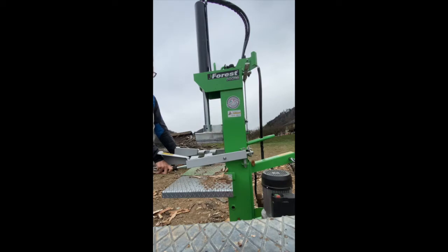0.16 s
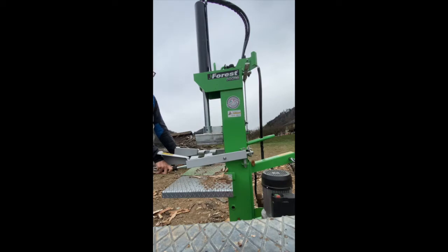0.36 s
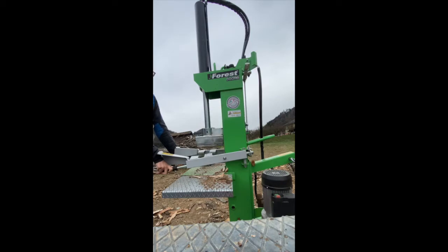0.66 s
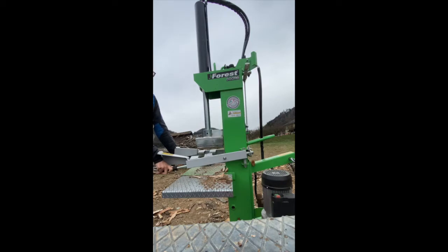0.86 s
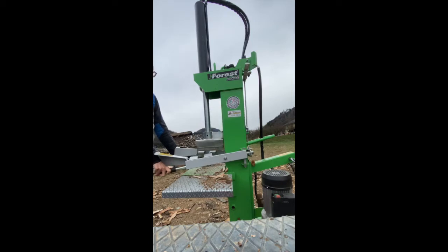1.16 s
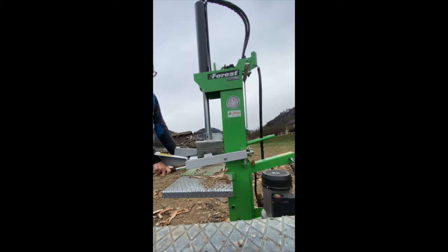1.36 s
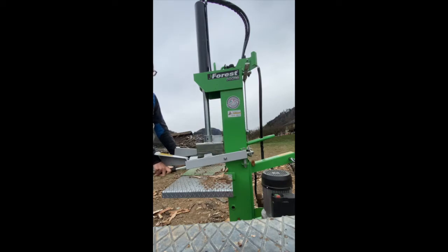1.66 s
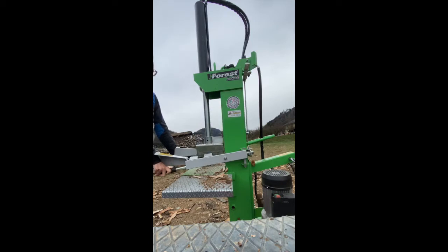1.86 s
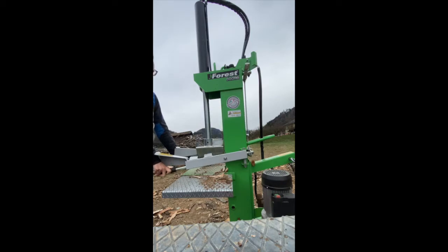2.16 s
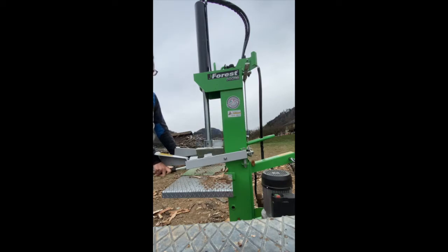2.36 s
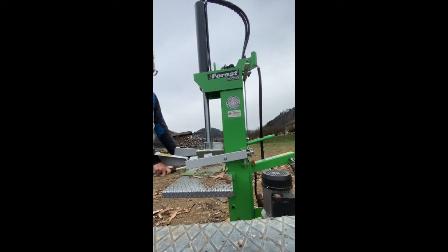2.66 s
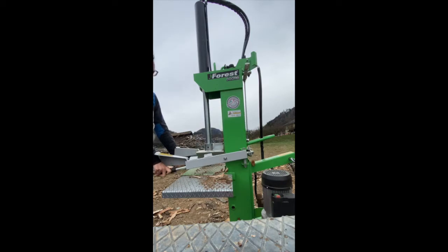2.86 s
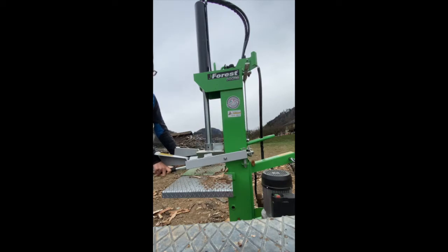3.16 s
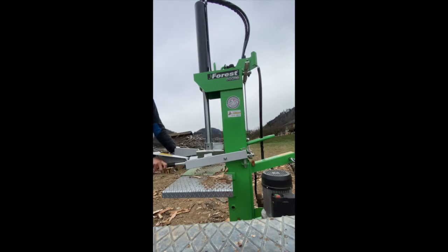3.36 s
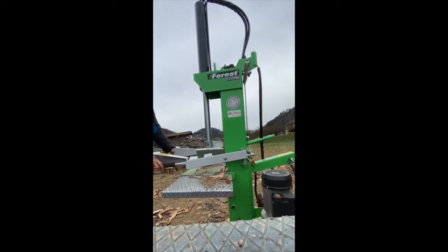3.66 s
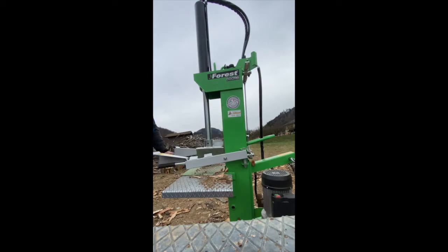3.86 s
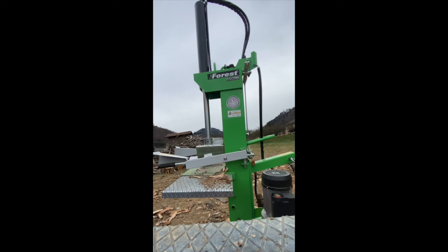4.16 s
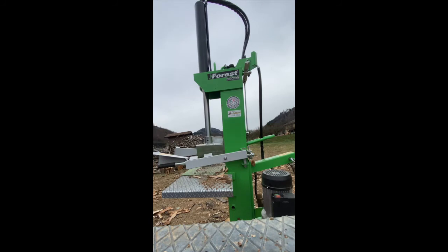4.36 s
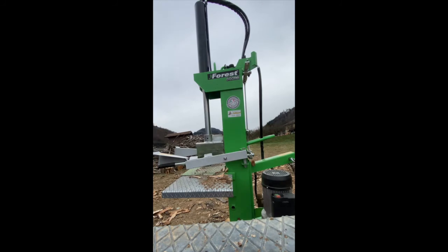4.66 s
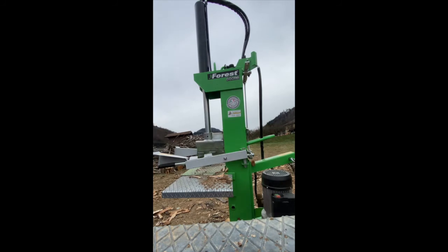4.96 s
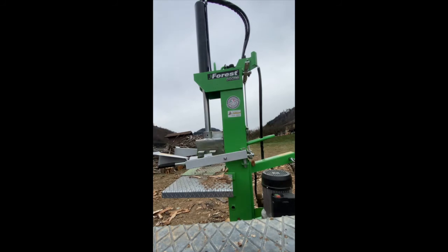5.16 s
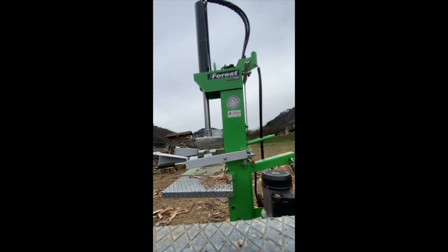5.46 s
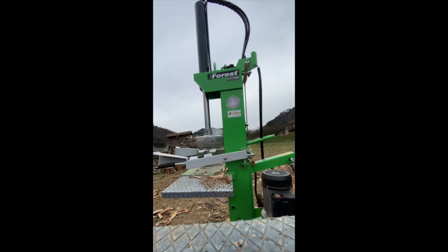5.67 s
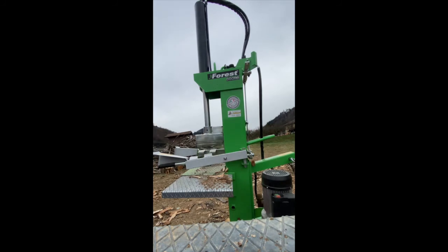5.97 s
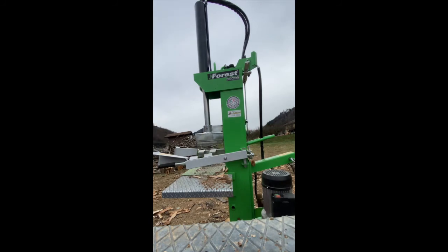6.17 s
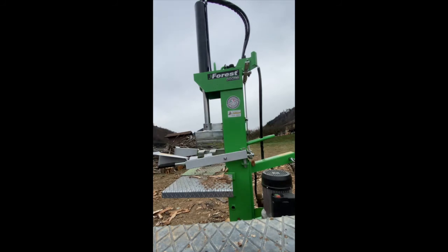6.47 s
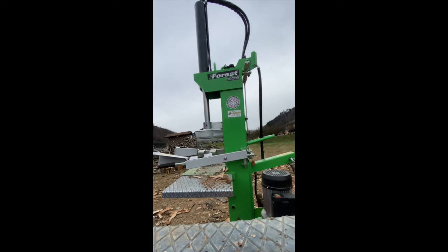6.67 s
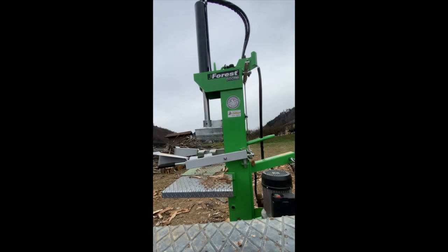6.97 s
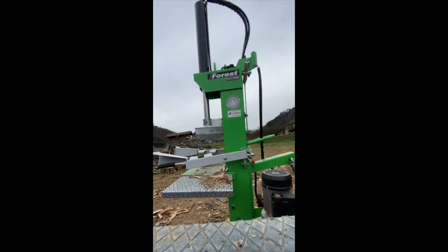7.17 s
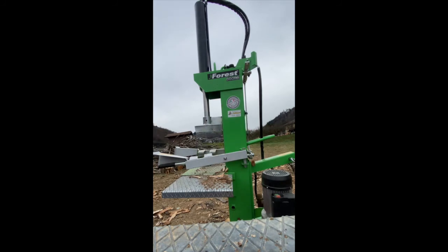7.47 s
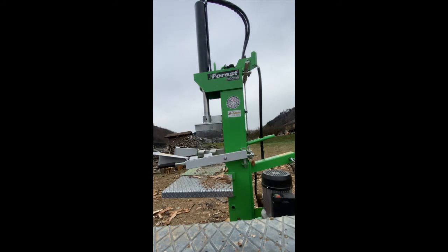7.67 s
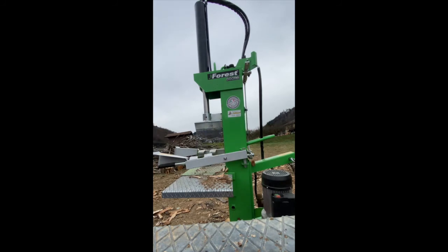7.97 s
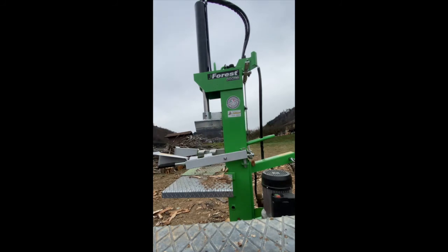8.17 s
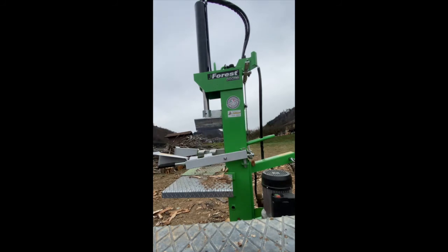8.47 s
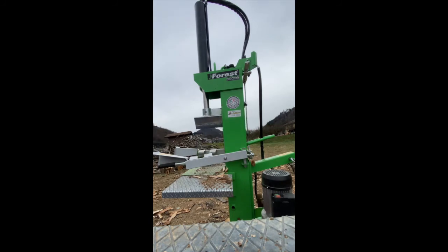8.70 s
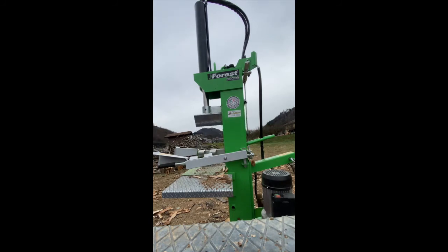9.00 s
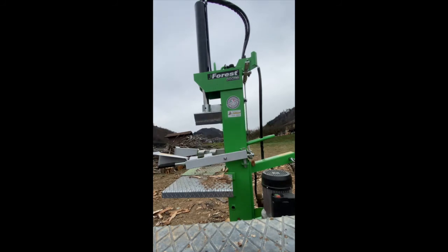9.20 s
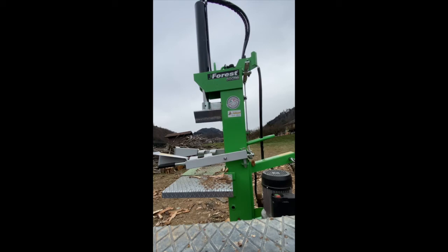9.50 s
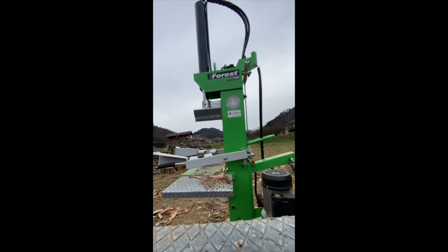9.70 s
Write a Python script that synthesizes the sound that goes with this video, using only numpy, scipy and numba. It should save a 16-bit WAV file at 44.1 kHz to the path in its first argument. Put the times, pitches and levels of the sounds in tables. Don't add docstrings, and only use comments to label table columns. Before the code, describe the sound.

Outdoors, an electric hydraulic log splitter runs without wood. Its gear pump holds a nasal, mid-low whine that sinks very slightly as the ram goes down. At about three seconds the tone collapses, a quick burst of steel clanks rattles the frame, and the whine returns a little higher while the ram rises. Casing rumble, oil hiss and motor hum continue throughout. Wind thumps on a phone a few metres away, in stereo.

```python
import sys
import numpy as np
from scipy import signal
from scipy.fft import rfft, irfft, next_fast_len
from scipy.io import wavfile
from scipy.ndimage import uniform_filter1d
from numba import njit

SR = 44100
rng = np.random.default_rng(int(sys.argv[2]) if len(sys.argv) > 2 else 0)


def unload_wav(signal):
    wavfile.write(
        sys.argv[1],
        SR,
        np.round(np.clip(np.atleast_2d(signal).T, -1, 1) * 32767).astype(np.int16),
    )


def makeup_ratio(level_db):
    decades = np.asarray(level_db, float) / 20
    return 10 ** decades


N = 433944
TIME = np.arange(N) / SR
SIZE = next_fast_len(N)
HZ = np.arange(SIZE // 2 + 1) * SR / SIZE
SIDES = np.array([[1], [-1]])
LEVER_OFF_S = 2.88
TEETH, MAINS_HZ = 9, 50

# [t/s, f/Hz]
TOOTH_RATE = [(0, 416), (2.45, 407.6), (2.52, 409), (2.6, 407.6), (2.8, 407), (2.845, 397),
              (2.875, 393), (2.915, 434.5), (3.14, 433), (3.3, 430), (3.5, 433),
              (4, 434), (6.6, 434.4), (7.05, 433.5), (7.4, 434.2), (8, 433.5), (8.4, 432.4),
                 (8.9, 430.5), (9.84, 428.8)]
# [t/s, phase: 0 ram starting down, 1 near the bottom, 2 returning, 3 near the top or idling]
STROKE = [(0, 0), (.9, 0), (1.9, 1), (2.35, 1), (2.6, .4), (2.86, .4), (2.91, 3), (3.12, 3), (3.2, 2),
          (6.5, 2), (8.8, 3), (9.84, 3)]
# [t/s, share of travel]
RAM_HEIGHT = [
    (0, .7),
    (2.86, 0),
    (3.2, 0),
    (9.84, 1),
]
# [t/s, level/dB]
TOOTH_TONE = [(0, -16.5), (.4, -19), (.9, -17), (2.505, -18), (2.53, -24.5), (2.59, -20), (2.745, -19.5),
              (2.84, -30), (2.865, -44), (2.93, -39.5), (3.14, -37), (3.2, -26.5), (3.3, -19.5),
              (3.35, -22.5), (3.45, -17.5), (4.0, -20.5), (6.0, -22), (9.84, -23.5)]
LOW_ORDERS = [8, 10, 12, 17, 18, 19, 20, 26, 27, 28, 35, 36, 44, 45, 46, 53, 54, 62, 63, 64, 71, 72]
HIGH_ORDERS = [80, 81, 89, 90, 91, 99, 107, 108, 116, 117, 118, 125, 126, 135, 144, 153, 162, 172, 179, 180,
               188, 198]
# [starting down level/dB, near bottom level/dB,
# returning level/dB, near top level/dB, left minus right level/dB]
ORDER_LEVELS = [(-73.5, -75.5, -48.5, -55, -1), (-57, -76.5, -48, -49.5, 4),
                (-59, -54.5, -53.5, -54, -2.5), (-65.5, -69.5, -61.5, -61, -6),
                (-38.5, -37.5, -50.5, -50, -6), (-50, -53.5, -46, -52, -7.5),
                (-62.5, -59.5, -69, -64.5, 1.5), (-44, -53, -62.5, -74.5, -5.5),
                (-39, -45, -49, -43, -11), (-39.5, -40.5, -57, -54, -10), (-60, -59, -76.5, -64, 6.5),
                (-50.5, -51, -57, -47.5, 0.5), (-60.5, -61, -75.5, -72.5, 5),
                (-54.5, -53, -57, -59, -2), (-64.5, -66, -75, -65.5, -2),
                (-59, -62.5, -65.5, -71, -7.5), (-59, -57.5, -48.5, -50, -9),
                (-63.5, -62, -63.5, -61, -8), (-62, -63, -55.5, -51, 1), (-80, -66, -78, -72.5, -1),
                (-60, -65, -63.5, -59, -5.5), (-59, -52, -82.5, -69.5, -13),
                (-77, -80, -68, -73, -2), (-77, -72, -74, -65, -1), (-74, -62, -70, -72, 2),
                     (-75, -69, -61, -63, 0), (-80, -80, -68, -68, -3), (-79, -74, -63, -63, 0),
                     (-70, -70, -63, -66, -2), (-70, -72, -76, -70, 2), (-74, -64, -58, -59, -1),
                     (-69, -54, -64, -61, -2), (-73, -67, -63, -60, 0), (-71, -71, -62, -68, -1),
                     (-59, -58, -61, -61, -3), (-70, -68, -78, -73, -1), (-73, -72, -67, -66, 0),
                     (-59, -58, -58, -67, 0), (-61, -67, -66, -74, 1), (-80, -80, -59, -73, 3),
                     (-68, -63, -60, -56, 1), (-58, -65, -80, -57, 1), (-60, -61, -70, -73, 2),
                     (-66, -62, -67, -72, 0)]
# [t/s, depth level/dB, half width t/s]
OCTAVE_DIPS = [
    (.27, -7.5, 0.2734),
    (1.0, -10.5, 0.1614),
]
IDLE_ORDERS = {4 * TEETH: (2.99, 3.15, 4), 6 * TEETH: (2.9, 3.1, -.5)}

# [t/s, low level/dB, middle level/dB, treble level/dB, 60 dB decay t/s]
CLANKS = [(3.150, -41.5, -23, -36, 0.05334), (3.159, -22.5, -33, -34, 0.1283),
          (3.164, -26.5, -39, -44, .08), (3.183, -22.5, -40, -29, 0.14), (3.194, -27.5, -26, -17, 0.0799),
          (3.196, -18.5, -32.5, -35, 0.3478), (3.210, -29.5, -30.5, -22, 0.1173),
          (3.2232, -18, -24, -29.5, 0.1505), (3.227, -14.5, -36.5, -26.5, .06),
          (3.230, -15.5, -23.5, -23.5, 0.1042), (3.235, -22, -21.5, -25.5, 0.0869),
          (3.245, -24.5, -27.5, -37.5, 0.11), (3.253, -26.5, -36.5, -46, 0.3534)]
# [f/Hz, level/dB, 60 dB decay t/s]
FRAME_MODES = [(697.6, 4.5, 0.2953), (790.06, -9.5, 0.43), (1134.1, -3, 0.2), (1328.2, -9, 0.33),
               (1666.8, -4, 0.25), (1766.1, -9.5, 1.056), (2224, -8.5, 0.17), (2244, -1.5, 0.058),
               (2643, -3, 0.1535), (3122.7, -6, 0.23), (3221.9, -6.5, 0.12), (4132, -8, 0.15),
               (4167.9, 2, 0.2), (4257, -5, 0.2), (5765, -19.5, 0.19), (6286, -17, 0.19), (8071, -3, 0.21)]
# [t/s, peak level/dB, ring f/Hz, 60 dB decay t/s]
TICKS = [(3.1505, -21.5, 3395, 0.01109), (3.1575, -22, 1507, .015), (3.185, -21, 898.6, .015),
         (3.1945, -22, 4529, .02), (3.197, -18.5, 1903, 0.0117), (3.2245, -11, 1500, .01),
         (3.2271, -4.5, 1050, .006), (3.2295, -15, 3696, 0.011), (3.2325, -12, 700.9, 0.013),
         (3.234, -19, 4110, 0.04536), (3.237, -14, 1303, 0.0088), (3.2485, -15, 600, .02),
         (3.166, -21, 550, .025), (3.204, -19, 600, .02), (3.2125, -19, 1000, .012),
         (3.217, -20, 1700, .01), (3.2565, -21, 3000, .012), (3.263, -21, 1900, .012),
         (3.272, -20, 900, .015), (3.286, -24, 1500, 0.01361)]

# [f/Hz, density level/dB per Hz]
CASING_SPECTRUM = [(150, -85), (260, -71), (450, -73.5), (650, -71), (930, -64.5), (1100, -68.5),
                   (1230, -71), (1440, -67.5), (1700, -72), (2230, -80.5), (2580, -79), (3450, -84),
                   (4700, -85), (5700, -77.5), (6800, -110)]
# [f/Hz, density level/dB per Hz]
HISS_SPECTRUM = [(5500, -95), (6350, -87), (7200, -77), (7900, -80), (8600, -75), (9500, -77.5),
                 (10500, -79), (11500, -83), (12500, -78.5), (14100, -79.5), (14900, -92), (15500, -77.5),
                 (16500, -85)]
# [f/Hz, width f/Hz, level/dB]
OIL_JETS = [(5682.4, 120, -61), (6901.3, 150, -58), (7374, 150, -64.5), (8349, 100, -50), (8560.4, 90, -51),
            (8986.5, 130, -65), (14041, 200, -62.5)]

MAINS_ORDERS = [2, 6, 14, 28]
# [level/dB, left minus right level/dB]
MAINS_LEVELS = [(-62.5, -1), (-57.5, 1), (-48.5, -8), (-57.5, -4.5)]

# [t/s, level/dB]
BREEZE = [(0, -47.5), (.6, -55), (2.4, -55), (2.65, -65), (3.0, -48.5), (3.9, -44), (4.25, -50),
          (4.9, -42.5), (5.2, -43), (5.33, -57), (5.5, -40.5), (7.0, -41), (7.15, -59), (7.5, -51.5),
          (7.8, -52), (8.3, -45), (9.55, -43.5), (9.75, -57.5)]
# [t/s, peak level/dB, fall by 20 dB t/s, upper part level/dB]
GUSTS = [(.05, -42.5, 0.0063, -6), (.44, -41, 0.0535, -7.5), (1.22, -36.5, 0.127, -3.5),
         (1.32, -42, 0.242, -4.5), (2.48, -38.5, 0.0591, -2), (2.8, -43, 0.0467, -10),
         (3.0, -36, 0.0858, -2.5), (3.13, -35.5, 0.1543, -4.5), (3.4, -37, 0.0219, -3.5),
         (3.53, -31.5, 0.1189, -11.5), (3.77, -32.5, 0.0303, 1.5), (3.84, -33.5, 0.145, -12.5),
         (4.47, -41, 0.067, -10), (4.9, -36.5, 0.1641, 0.5), (5.04, -37, 0.1652, -1),
         (5.43, -31, 0.1319, -0.5), (5.62, -34.5, 0.024, 2.5), (5.73, -31.5, 0.0849, -13.5),
         (5.89, -28.5, 0.1439, -6), (6.14, -32, 0.1073, -4.5), (6.38, -34.5, 0.0948, 0.5),
         (6.5, -30.5, 0.1394, -6.5), (6.75, -36, 0.0771, 5.5), (6.91, -33.5, 0.1256, 0.5),
         (7.3, -36.5, 0.0871, -7.5), (7.48, -31.5, 0.1334, -4.5), (8.47, -42, 0.4176, -1.5),
         (8.9, -38.5, 0.0748, -5.5), (9.47, -36, 0.0751, -6), (9.57, -29.5, 0.0897, -7.5)]
# [t/s, peak level/dB, f/Hz, left minus right level/dB]
THUMPS = [(0.438, -37, 139.9, -2.5), (1.209, -34, 229.6, -15), (2.458, -36, 229.8, -9),
          (2.99, -33, 230.2, -14), (3.067, -36, 229.8, -6.5), (3.124, -35.5, 180, -7),
          (3.409, -31, 139.8, -4), (3.474, -38, 230, -7), (3.523, -27.5, 109.9, -3),
          (3.731, -28, 230.1, -13.5), (3.764, -25.5, 230.2, -9.5), (3.838, -31.5, 85, 0.5),
          (3.921, -37.5, 179.8, -10), (3.953, -38, 230, -12.5), (4.892, -32.5, 229.6, -3.5),
          (4.964, -37.5, 229.8, 0), (5.003, -33.5, 229.7, -12.5), (5.11, -32, 140.1, -2),
          (5.24, -38.5, 229.8, 0), (5.379, -35, 229.8, -12.5), (5.442, -27.5, 230.6, -12.5),
          (5.512, -29.5, 229.9, -7), (5.552, -37, 180, -12), (5.589, -36, 230, -2.5),
          (5.626, -27.5, 229.1, -8), (5.659, -33.5, 230.3, -14), (5.691, -32, 110, 3),
          (5.849, -37.5, 230.1, -4.5), (5.881, -30, 230.1, -8), (5.922, -28, 139.8, -10.5),
          (6.034, -35.5, 139.7, -2), (6.13, -32, 230.1, -36), (6.332, -29, 140.1, -6),
          (6.372, -28.5, 229.7, -13), (6.474, -29, 230, -5.5), (6.543, -30.5, 110, -0.5),
          (6.598, -38, 180, -6), (6.658, -34, 140.1, -5), (6.748, -27, 229.5, -10.5),
          (6.846, -32.5, 229.9, -8.5), (6.905, -26.5, 179.6, -9.5), (6.956, -34, 110, -1.5),
          (7.029, -37, 230.1, -7), (7.426, -33, 84.9, -6.5), (7.481, -30, 140, -3),
          (8.467, -36.5, 140.1, -8), (8.68, -35, 109.9, -3), (9.461, -34.5, 229.3, -7.5),
          (9.501, -38.5, 230, -10), (9.566, -31, 230.1, -10)]

# [f/Hz, phase/rad]
PORT_LEAD = [(0, 0), (600, -1.3), (1460, .2), (2600, .3), (3200, .9), (3900, -.2), (4350, 2.2), (4800, 2.1),
             (5300, 1.1), (6050, 2.0), (6400, 3.14), (8000, 3.14), (9800, 6.28), (11400, 6.28),
             (12930, 9.42), (14900, 9.42), (15300, 11.6), (16100, 11.8)]
# [f/Hz, left minus right level/dB]
PORT_PAN = [(60, 4.5), (110, -2.5), (200, -0.5), (380, -1), (700, -11.5), (1290, -10), (2380, 4),
            (4400, -1), (8120, 2.5), (13000, 0)]


def pump(shaft, shaft_hz, stroke, height):
    tooth_db, down = curves(TOOTH_TONE)[0], TIME < LEVER_OFF_S
    pan_db = np.where(down, -1.0 + 1.8968 * height, 2.5 + 0.93 * height) + .4 * walk(2.98)
    lead_rad = np.where(down, -0.4367 - 0.18 * height, -1.1234 + 0.514 * height)
    out = np.zeros((2, N))
    add_sine(out, TEETH * shaft, tooth_db + 0.088 * walk(30) + .3 * walk(3), pan_db, lead_rad)

    relief_db = 0.3218 * np.minimum(tooth_db + 24.5, 0)
    crossing_db = -12 * np.exp(-((TIME - 2.88) / .035) ** 4)
    wavers = [walk(4.0) + 0.5785 * walk(14) for _ in range(6)]
    dips_db = sum(db * np.exp(-((TIME - s) / half_s) ** 8) for s, db, half_s in OCTAVE_DIPS)
    waver_db = np.where(down, .8, 1.8)
    orders = LOW_ORDERS + HIGH_ORDERS
    starts = 2 * np.pi * rng.random(len(orders))
    for order, (*levels, pan) in zip(orders, ORDER_LEVELS):
        harmonic = (order + 4) // TEETH
        from_s, to_s, idle_db = IDLE_ORDERS.get(order, (0, 0, 0))
        singing = (TIME > from_s) & (TIME < to_s)
        db = np.interp(stroke, range(4), levels) + np.where(singing, idle_db, relief_db) + crossing_db
        if order == 2 * TEETH:
            db = db + 0.9306 * wavers[0] + dips_db
        db = db + waver_db * wavers[harmonic % 6]
        start = starts[harmonic] + 0.324 * wavers[(harmonic + 3) % 6]
        add_sine(out, order * shaft + start, db, np.full(N, 1. * pan), lead(order * shaft_hz))
    return out


def valve():
    bands = np.array([band(384.1, 1665.8), band(2424.5, 6470), band(6153, 13946)])
    rattle, blows, cracks = np.zeros((3, N)), np.zeros(N), np.zeros(N)
    t = TIME[:SR // 2]
    for s, low_db, mid_db, high_db, t60 in CLANKS:
        i = int(s * SR)
        fall = 1000 ** (-t / np.clip(t60, .02, .5)) * (1 - np.exp(-t / 0.00039))
        rattle[:, i:i + len(t)] += (makeup_ratio([[low_db - 4.0], [mid_db - 4.0], [high_db]]) * fall) ** 2
        blows[i] = makeup_ratio(mid_db + low_db + 14.5)
        cracks[i] = makeup_ratio(2 * low_db + 12)
    ring = sum(makeup_ratio(db) * damped_sine(t, hz, t60) for hz, db, t60 in FRAME_MODES)
    crack = np.exp(-t / 0.0004) * np.cos(2 * np.pi * 1300 * t)
    struck = signal.fftconvolve(blows, ring)[:N] * makeup_ratio(-4.5)
    struck += signal.fftconvolve(cracks, crack)[:N]
    rough = np.sum(np.sqrt(rattle) * bands, axis=0)
    scattered = 0.4703 * np.roll(rough, 331) * SIDES
    return ports(rough + struck + ticks()) + scattered


def ticks():
    out, t = np.zeros(N), TIME[:SR // 10]
    for s, db, hz, t60 in TICKS:
        i = int(s * SR)
        out[i:i + len(t)] += makeup_ratio(db) * damped_sine(t, hz, t60)
    return out


def flow(shaft, height):
    casing_db = -1.149 + 0.8676 * height - .5 * (TIME < LEVER_OFF_S)
    hiss_db = -1.6156 + 3 * height
    throb = 1 + 0.0356 * np.cos(shaft) + .08 * np.cos(2 * shaft) + 0.069 * np.cos(TEETH * shaft)

    casing = coloured(CASING_SPECTRUM, 0.30555)
    body = signal.sosfilt(signal.butter(2, 1100, fs=SR, output="sos"), casing)
    panels = casing - body
    casing = body * makeup_ratio(.8 * walk(6)) + panels * makeup_ratio(0.769 * walk(6))
    casing = casing * makeup_ratio(casing_db) * throb

    flutter_db = 0.55 * walk(9) + 0.7528 * walk(20) + 0.5606 * walk(80)
    hiss = coloured(HISS_SPECTRUM, .05) * makeup_ratio(hiss_db + flutter_db) * throb

    jets = np.zeros(N)
    for hz, width_hz, db in OIL_JETS:
        jets += makeup_ratio(db + 1.6 * walk(2.7)) * band(hz - width_hz / 2, hz + width_hz / 2)
    return casing + hiss + ports(jets * makeup_ratio(hiss_db))


def motor(shaft):
    mains = 2 * np.pi * MAINS_HZ * TIME
    out, flat = np.zeros((2, N)), np.ones(N)
    line_db = np.interp(TIME, [.5, 1.2, 2.75, 2.88], [-46.5, -42, -42.5, -55]) + 2.3 * walk(16)
    add_sine(out, TEETH * shaft + 2 * mains, line_db, -2.5 * flat, -.6 * flat)
    off_load_db = -3 * (TIME > LEVER_OFF_S)
    for order, (db, pan_db) in zip(MAINS_ORDERS, MAINS_LEVELS):
        hum_db = db + off_load_db + 3.5164 * walk(9)
        add_sine(out, order * mains, hum_db, pan_db * flat, lead(order * MAINS_HZ) * flat)
    return out


def wind():
    patch = walk(30)
    breeze_db = curves(BREEZE)[0] - 5 + 6 * patch + np.array([[0], [-6]])
    gust_db = 2.5 * patch + np.array([[-2], [-6.5]])
    power = makeup_ratio(2 * breeze_db) + gusts() * makeup_ratio(2 * gust_db)
    low = steady(band(43.28, 118.41, order=3)) + 0.3096 * SIDES * band(60, 140)
    upper = np.array([0.8186 * steady(band(118, 319)), 1.2298 * steady(band(121, 301))])
    calm_power = makeup_ratio(2 * -58.5)
    return np.sqrt(power[0]) * low + np.sqrt(power[1] + calm_power) * upper + thumps()


def gusts():
    low, upper = np.zeros((2, N))
    for s, peak_db, fall_s, upper_db in GUSTS:
        away_s = np.maximum(TIME - s, (s - TIME) / 0.896)
        power = makeup_ratio(2 * peak_db - 40 * away_s / fall_s)
        low = low + power
        upper = upper + power * makeup_ratio(2 * upper_db)
    return np.array([low, upper])


def thumps():
    out, cycles = np.zeros((2, N)), 0.5457
    turns = rng.random((len(THUMPS), 2))
    for (s, db, hz, pan_db), turn in zip(THUMPS, turns):
        i = slice(int((s - .04) * SR), int((s + .04) * SR))
        t = TIME[i] - s
        tilt = makeup_ratio(np.clip(pan_db, -14, 14))
        gain = makeup_ratio(db + 2.5) * 2 / (1 + tilt) * np.array([[tilt], [1]])
        phase = hz * t + turn[0] + 0.2589 * (turn[1] - .5) * SIDES
        out[:, i] += gain * np.exp(-.5 * (t * hz / cycles) ** 2) * np.cos(2 * np.pi * phase)
        push_hz = hz * .5
        push = np.exp(-.5 * (t * push_hz / cycles) ** 2) * np.sin(2 * np.pi * (push_hz * t + turn[1]))
        out[:, i] += makeup_ratio(db + 2.5 - 4) * push
    return out


def steady(x, span_s=.03):
    return x / np.sqrt(uniform_filter1d(x ** 2, int(span_s * SR)) + 0.036)


def coloured(spectrum, diffuse):
    diffuse = np.clip(diffuse, 0, 1)
    ripple = np.interp(HZ, np.arange(0, SR, 70), rng.standard_normal(SR // 70))
    gain = makeup_ratio(over_hz(spectrum, HZ) + 1.8 * ripple - .2) * np.sqrt(SR / 2)
    direct, *scattered = irfft(rfft(rng.standard_normal((3, SIZE))) * gain, SIZE)[:, :N]
    return np.sqrt(1 - diffuse) * ports(direct) + np.sqrt(diffuse) * np.array(scattered)


def band(lo_hz, hi_hz, order=2):
    sos = signal.butter(order, [lo_hz, hi_hz], "band", fs=SR, output="sos")
    x = signal.sosfilt(sos, rng.standard_normal(N))
    return x / x.std()


def damped_sine(t, hz, t60):
    return 1000 ** (-t / t60) * np.sin(2 * np.pi * hz * t)


@njit
def add_sine(out, phase, db, pan_db, lead_rad):
    for i in range(0, len(phase), 16):
        gain = np.sqrt(2) * 10 ** (db[i] / 20)
        tilt = 10 ** (pan_db[i] / 40)
        c, s = np.cos(lead_rad[i] / 2), np.sin(lead_rad[i] / 2)
        for j in range(i, min(i + 16, len(phase))):
            sine, cosine = np.sin(phase[j]), np.cos(phase[j])
            out[0, j] += gain * tilt * (sine * c + cosine * s)
            out[1, j] += gain / tilt * (sine * c - cosine * s)


def ports(x):
    tilt = makeup_ratio(over_hz(PORT_PAN, HZ) / 2) * np.exp(.5j * lead(HZ))
    return irfft(rfft(x, SIZE) * np.array([tilt, 1 / tilt]), SIZE)[:, :N]


def lead(hz):
    return np.interp(hz, *np.transpose(PORT_LEAD))


def walk(rate_hz):
    k = int(SR / rate_hz)
    held = np.repeat(rng.standard_normal(N // k + 1), k)
    return 1.2449 * uniform_filter1d(uniform_filter1d(held, k), k)[:N]


def curves(table):
    s, *columns = np.transpose(table)
    return [np.interp(TIME, s, c) for c in columns]


def over_hz(table, hz):
    f, v = np.transpose(table)
    return np.interp(np.log(hz + 1), np.log(f + 1), v)


def scene():
    tooth_hz = curves(TOOTH_RATE)[0]
    shaft_hz = tooth_hz / TEETH * (1 + 0.00040524 * walk(6))
    shaft = 2 * np.pi * np.cumsum(shaft_hz) / SR
    stroke, height = curves(STROKE)[0], curves(RAM_HEIGHT)[0]
    splitter = pump(shaft, shaft_hz, stroke, height) + valve() + flow(shaft, height) + motor(shaft)
    return splitter + wind()


def band_limit(x):
    return signal.sosfilt(signal.butter(12, 15800, fs=SR, output="sos"), x)


def record(dry):
    low_pass = signal.ellip(10, .2, 70, 15780, fs=SR, output="sos")
    mix = signal.sosfilt(low_pass, dry)
    return band_limit(mix)


dry = scene()
out = record(dry)
unload_wav(out)
```